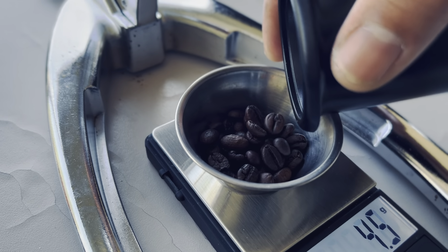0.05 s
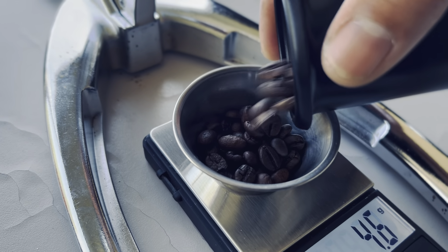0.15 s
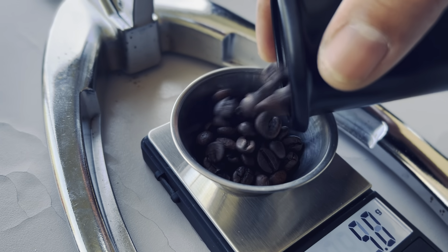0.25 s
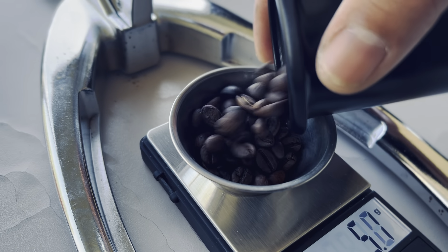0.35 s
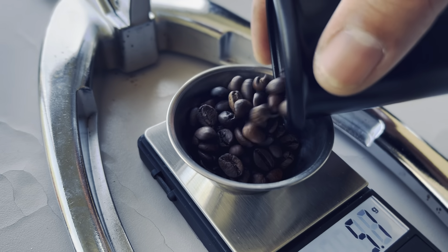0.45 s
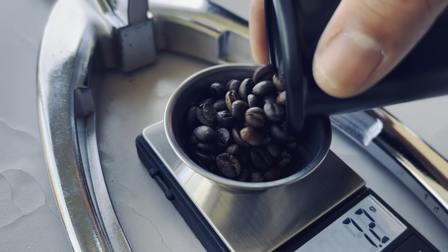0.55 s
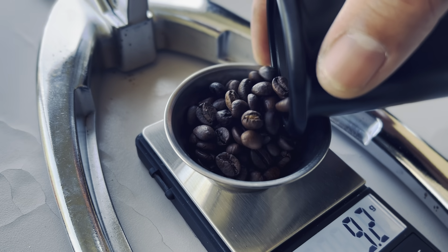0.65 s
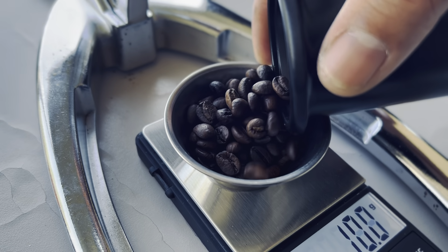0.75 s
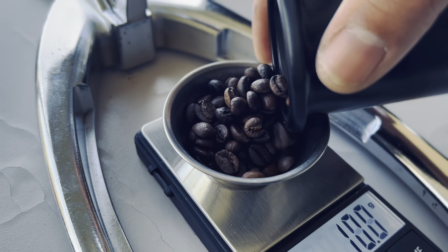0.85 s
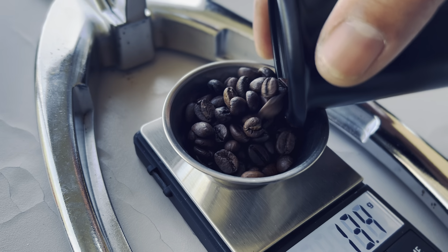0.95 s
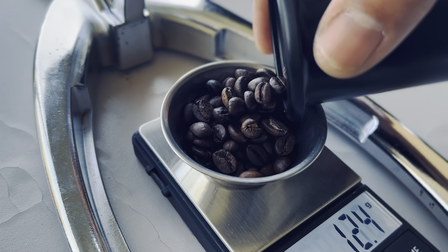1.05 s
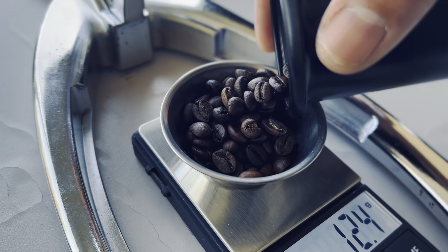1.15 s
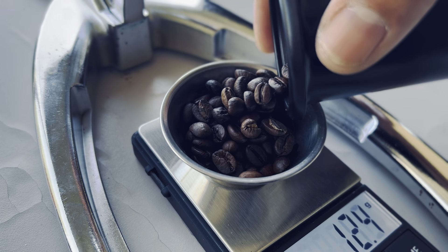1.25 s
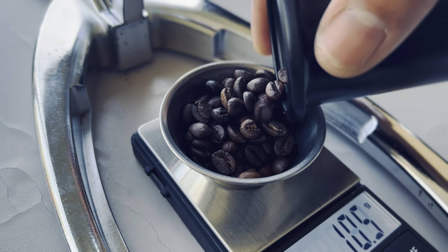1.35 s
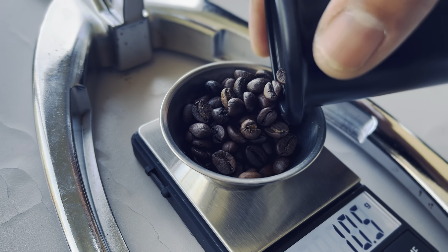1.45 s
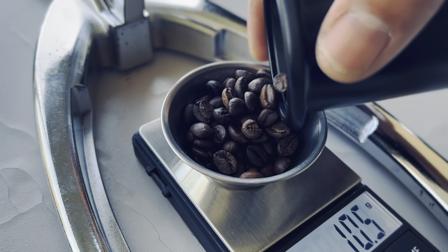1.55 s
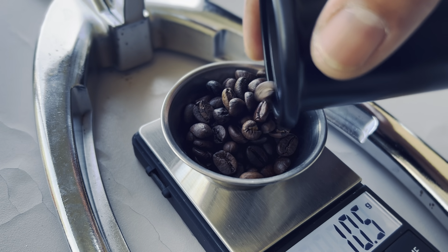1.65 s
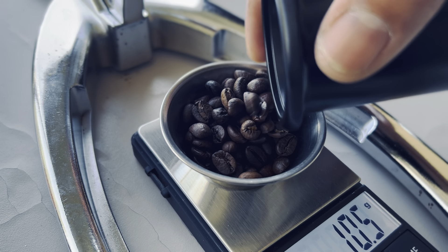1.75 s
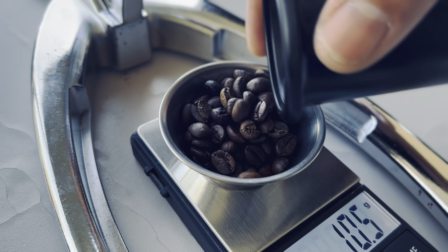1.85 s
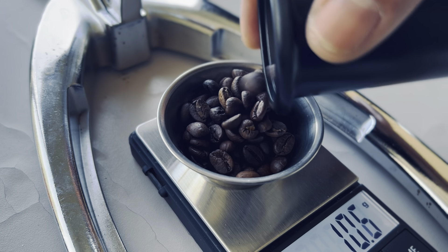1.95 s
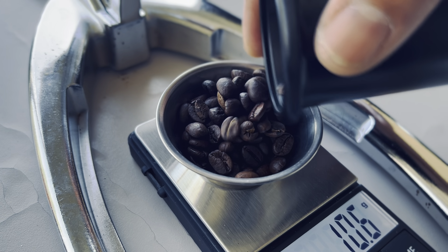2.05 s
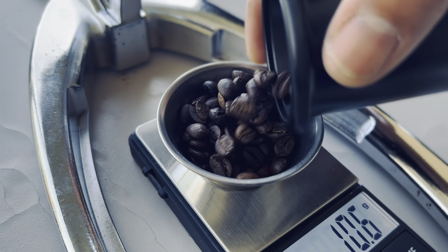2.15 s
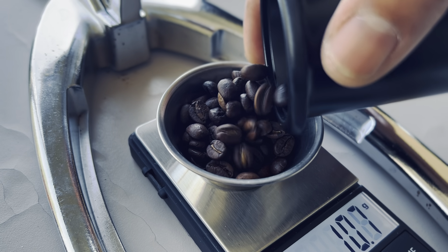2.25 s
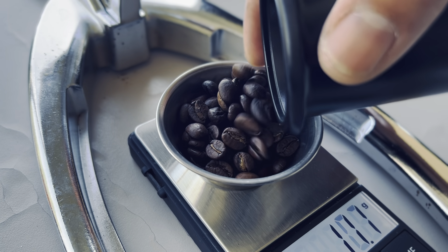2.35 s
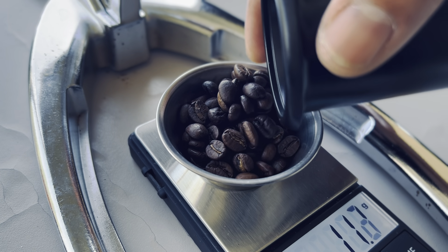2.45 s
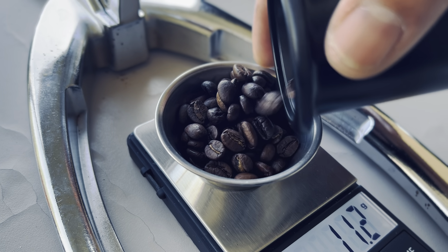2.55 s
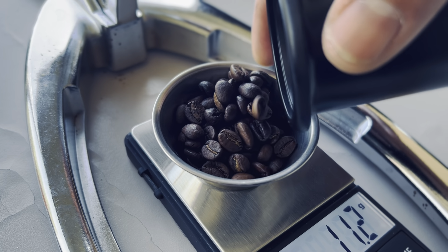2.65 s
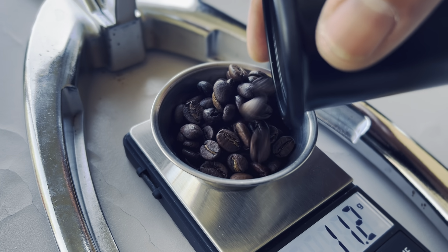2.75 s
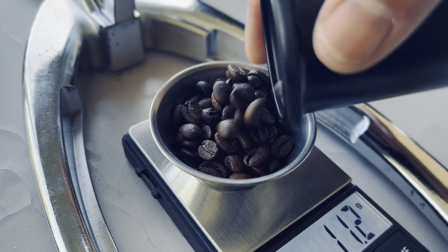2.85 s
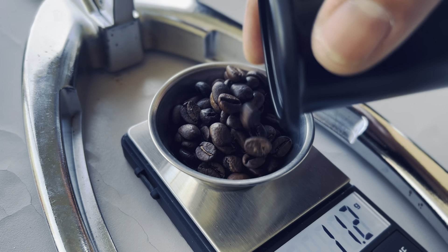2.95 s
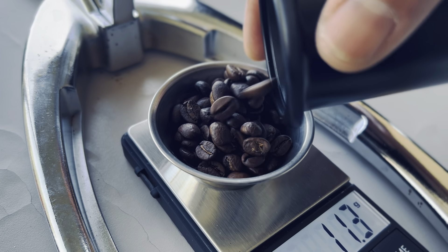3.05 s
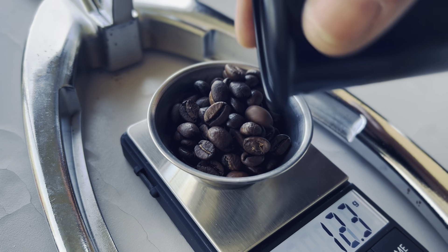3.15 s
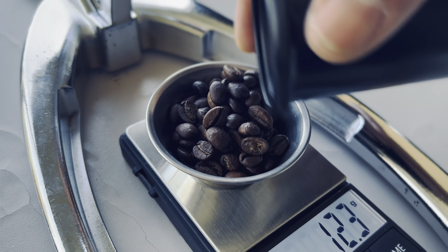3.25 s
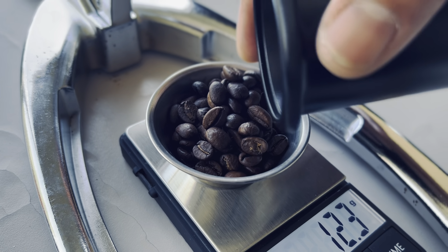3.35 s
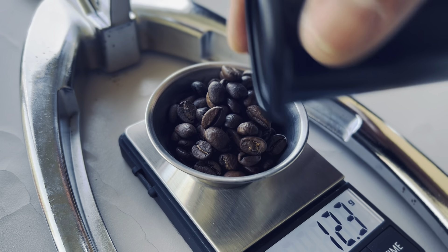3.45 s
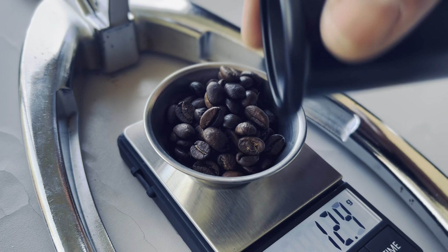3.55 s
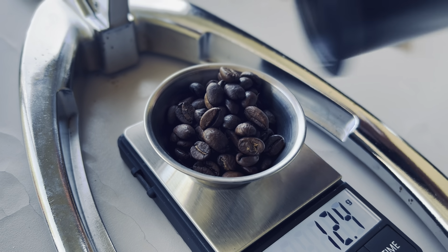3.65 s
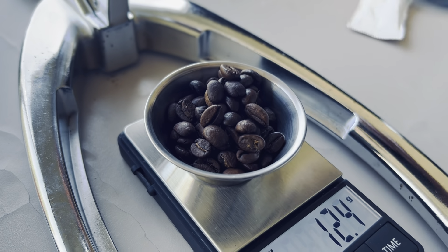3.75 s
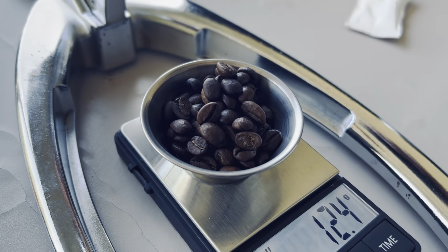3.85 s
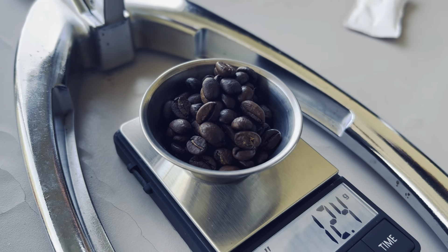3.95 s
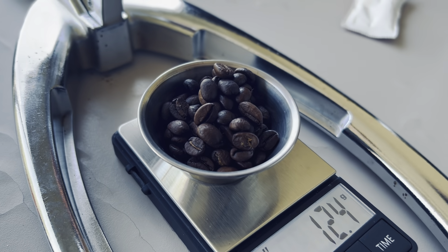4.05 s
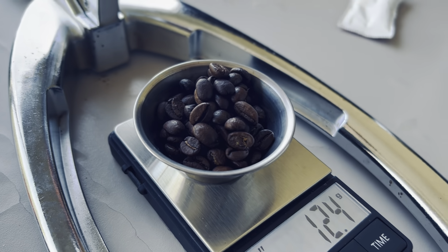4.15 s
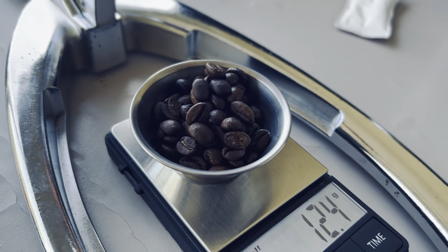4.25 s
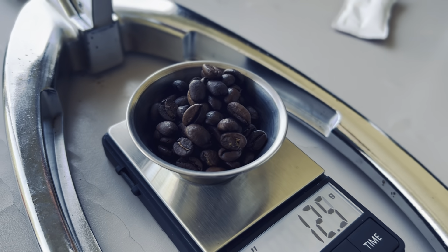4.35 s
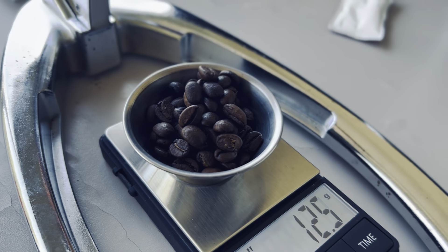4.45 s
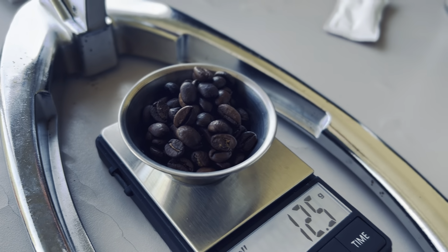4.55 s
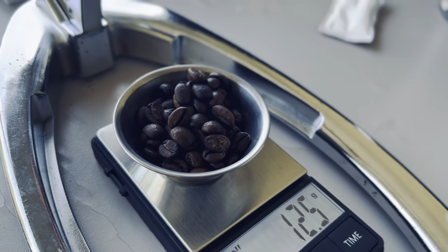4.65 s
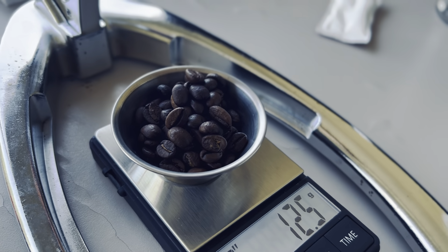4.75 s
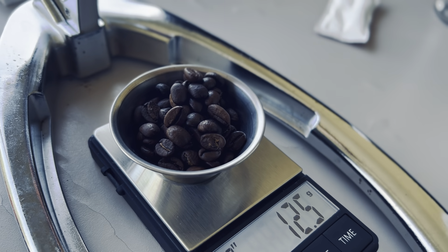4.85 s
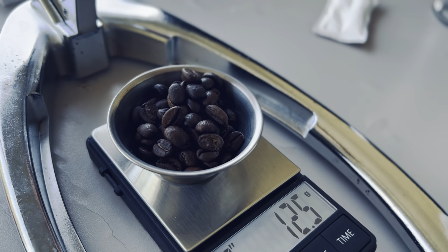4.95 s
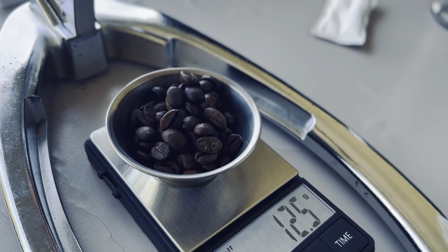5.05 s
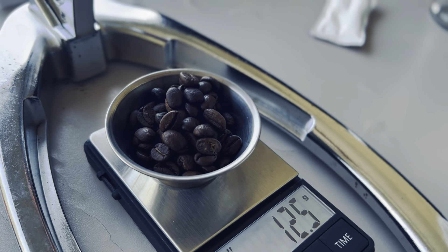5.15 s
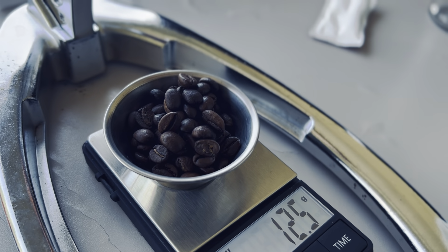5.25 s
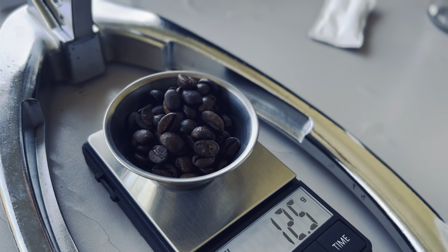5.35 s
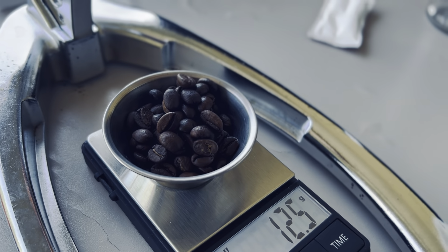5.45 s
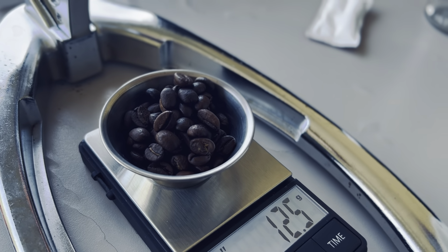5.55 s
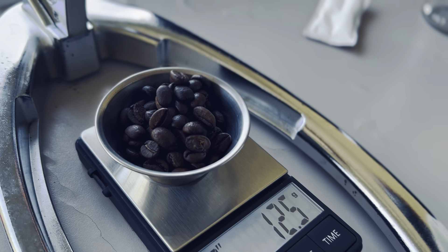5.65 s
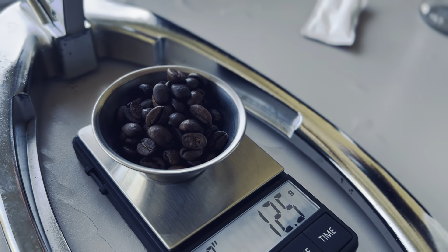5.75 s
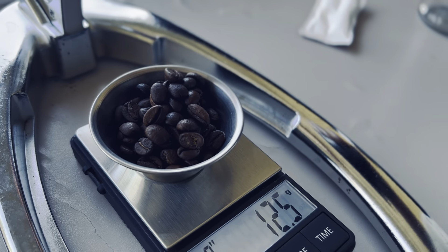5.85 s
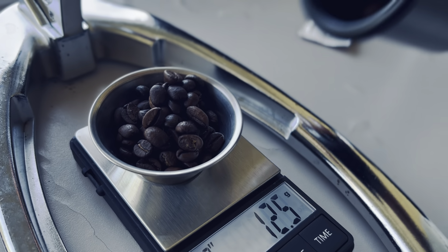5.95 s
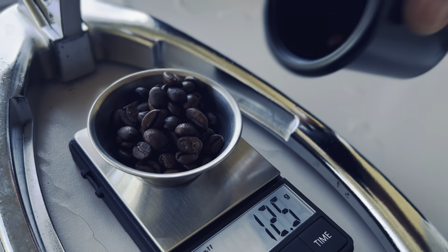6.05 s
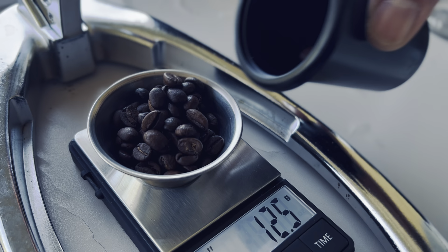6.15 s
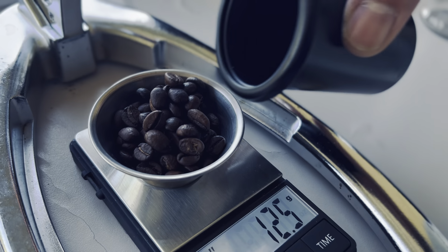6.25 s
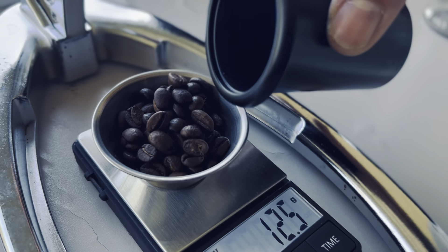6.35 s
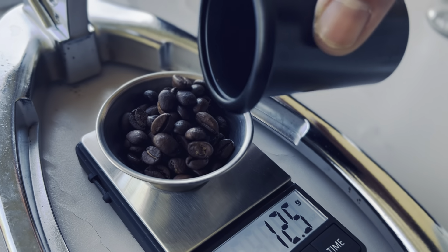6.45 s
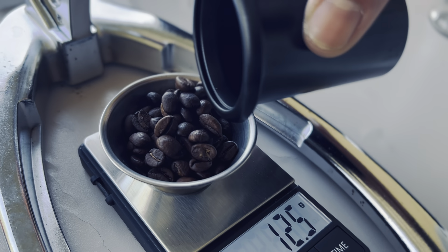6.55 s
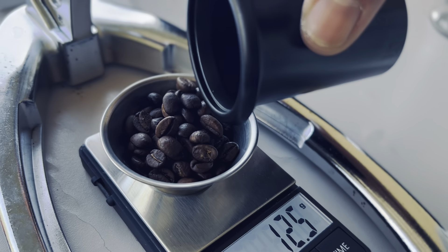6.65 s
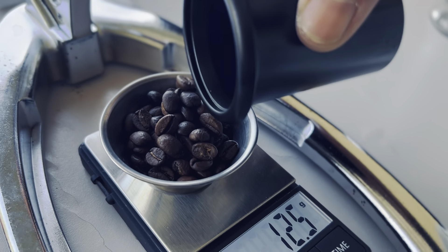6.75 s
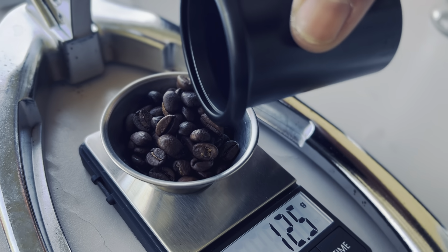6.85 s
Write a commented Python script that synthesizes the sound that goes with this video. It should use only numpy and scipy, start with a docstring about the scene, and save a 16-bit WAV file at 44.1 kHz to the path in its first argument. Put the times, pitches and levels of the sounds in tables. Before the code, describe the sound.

Roasted coffee beans tick and rattle into a small steel cup, then a plastic canister knocks down and scrapes on the counter.

```python
"""Roasted coffee beans tick and rattle as they pour from a plastic canister into a small steel cup.
The beans click against each other, sound in the hollow canister and make the cup's wall ring.
After more careful shaking, the canister knocks down on the counter, slides, is dragged up again
and gets one last tilt. A fridge and the house hum in the quiet kitchen, and two microphones
a little apart hear it all."""
import sys
import numpy as np
from scipy import signal
from scipy.fft import rfft, irfft, next_fast_len
from scipy.io import wavfile

SR = 44100
rng = np.random.default_rng(int(sys.argv[2]) if len(sys.argv) > 2 else 0)


def bounce(signal):
    """Save signal as a 16-bit WAV file at the path given by the first command-line argument."""
    frames = np.transpose(np.atleast_2d(signal))
    limited = np.clip(frames, -1, 1)
    pcm = np.round(limited * 32767).astype(np.int16)
    wavfile.write(sys.argv[1], SR, pcm)


N = 304290
# when the canister moves to the counter, is lifted, is held upright and comes back nearly empty
ON_COUNTER_S, LIFTED_S, UPRIGHT_S, RETURN_S = 3.5, 4.5, 5.05, 6.2

# The clearest bean landings: t/s, bright tick level/dB, dull part compared with bright/dB
LANDINGS = [(.0088, -30, -3.5), (0.0286, -23, -3), (0.048, -25, -17.5), (0.0555, -33.5, -5), (.11, -30, 7),
            (0.1286, -26.5, -1), (0.1403, -33.5, 10.5), (0.1583, -27.5, 0), (0.1756, -11.5, -9.5),
            (0.1828, -23, -0.5), (0.1997, -11.5, -19), (.216, -8.5, -24.5), (0.2341, -14.5, -23),
            (.2435, -25, -6.5), (.299, -24, -10.5), (0.3081, -24, -8), (.332, -21.5, -4), (.3615, -24, 1),
            (.378, -25, -7.5), (0.389, -20, -5), (0.4112, -19.5, -4), (0.4292, -20, -3.5), (0.4693, -36, 5),
            (0.4946, -42.5, 9), (.511, -32.5, 4.5), (0.518, -37.5, 12), (0.5452, -32, 6.5),
            (0.5687, -33, 4), (0.5965, -26, -2.5), (0.6035, -30, -11.5), (.6376, -18, -2.5),
            (0.6594, -34, 6.5), (0.6743, -36, 2), (.693, -33.5, -1.5), (0.7033, -41, 9), (0.715, -50, 10),
            (0.7436, -31.5, -0.5), (.7575, -39, -3.5), (0.7792, -39, 0.5), (0.7974, -35, 2.5),
            (0.8408, -40, -5.5), (.895, -37, -3.5), (0.9263, -39, 6), (.941, -58, 23), (0.9537, -57, 24),
            (0.9672, -39, -6), (0.9843, -37, -4), (0.992, -31.5, -3.5), (1.022, -31.5, -8),
            (1.056, -48.5, -1), (1.3752, -42, -8), (1.604, -50.5, 4.5), (1.6136, -57, 17), (1.647, -48, -2),
            (1.6877, -40.5, -5.5), (1.805, -30, -21), (1.8705, -41, -11), (1.907, -50, 3.5),
            (1.945, -39, 12.5), (1.9508, -29, -10), (1.9727, -34.5, 3.5), (1.9842, -33.5, -10.5),
            (1.991, -23, -24), (2.0128, -26.5, -2.5), (2.0251, -35, -6.5), (2.04, -35, -20),
            (2.1054, -39.5, -3), (2.1182, -48, 19.5), (2.134, -29, 2), (2.1533, -26.5, -1),
            (2.1618, -39, -8.5), (2.1804, -18, -8), (2.197, -30, 0), (2.232, -47.5, 5), (2.2776, -35.5, 2),
            (2.2918, -30, 2), (2.306, -59, 25.5), (2.321, -28.5, -13), (2.337, -26, 2), (2.3702, -35, -7),
            (2.375, -38, -13), (2.3879, -32.5, -9.5), (2.3978, -35, -2), (2.412, -38.5, -8.5),
            (2.4277, -23.5, -11), (2.5182, -52.5, 14), (2.5754, -43.5, 2), (2.5826, -20.5, -28.5),
            (2.6023, -33, 4.5), (2.64, -24, -24.5), (2.6746, -43.5, 8), (2.6863, -43, 2),
            (2.717, -42.5, -5), (2.7483, -32, -1), (2.759, -43.5, 13.5), (2.7698, -31.5, -11),
            (2.7878, -26, -21), (2.792, -30, -12), (2.7987, -29, -12), (2.8135, -25.5, -6), (2.816, -29, 1),
            (2.8408, -39.5, 9), (2.861, -30.5, -23), (2.8693, -29, -18.5), (2.8929, -24.5, .5),
            (2.9195, -31.5, -9.5), (2.939, -26, -7), (2.9503, -20.5, -9.5), (2.9624, -35, -3.5),
            (2.983, -38.5, -2), (3.0152, -35.5, -23), (3.041, -51, 10), (3.0532, -33.5, 3.5),
            (3.09, -28.5, -11), (3.1042, -32, -8), (3.1207, -45, 0), (3.1299, -47.5, -9),
            (3.1876, -31.5, -10.5), (3.225, -53.5, -2), (3.876, -38.5, -15), (4.1515, -53.5, 8),
            (4.411, -60, 21.5), (4.5677, -26, 0.5), (4.5806, -32.5, 12), (4.5907, -19, 4.5),
            (4.6218, -45, 3), (4.656, -26, -11.5), (4.7005, -32.5, 2.5), (4.741, -28.5, -11),
            (4.76, -39.5, 14), (4.859, -49, 18), (4.8753, -41.5, 7), (4.923, -28.5, 1.5), (4.9315, -37, 6),
            (4.948, -15.5, -7.5), (4.956, -43, 0), (4.979, -13.5, -14), (4.9837, -30.5, -14),
            (5.015, -21.5, -6), (5.021, -19.5, -10), (5.0634, -42.5, 5), (5.079, -27, 3.5),
            (5.1064, -43.5, 3), (5.1337, -20, -5), (5.1564, -19, 1.5), (5.1728, -27.5, -8), (5.188, -28, 4),
            (5.2104, -38, 15.5), (5.2404, -36.5, 11), (5.2497, -28.5, 3), (5.2807, -32, 3),
            (5.3248, -39, 11), (5.3375, -30, -14.5), (5.3582, -52.5, 14), (5.3748, -49, 1),
            (5.763, -50.5, 3), (5.773, -52, -3), (5.9743, -52, 7), (5.9929, -42, 1), (6.527, -45, -7),
            (6.569, -45, 8.5), (6.655, -53, 15.5), (6.6727, -48, 4), (6.8339, -56, -14)]
# Moving beans, one curve each for pouring, shaking, settling, lifting and the last tilt:
# t/s, dull level/dB, bright part compared with dull/dB
RATTLE_CURVES = [
    [(0, -61, -12), (.04, -49.5, -2), (.1, -51, -6), (.22, -38.5, 2.5), (.42, -41.5, 5), (.5, -47, -8),
     (.65, -60, -7.5), (.74, -70, -5.5), (1.02, -64.5, -16), (1.13, -100, 8)],
    [(1.5, -110, -6), (1.62, -65.5, -13), (1.78, -87, 5), (1.87, -58.5, -8), (2.0, -54, -24),
     (2.08, -71, -7), (2.2, -57, -3.5), (2.3, -54, -24), (2.38, -69, -5), (2.53, -60, -6.5),
     (2.74, -57.5, -9), (2.81, -46.5, -7), (2.95, -66, -6), (3.05, -68, -9), (3.12, -72, -10),
     (3.3, -96, -2)],
    [(3.6, -86.5, -9), (3.65, -44.5, -16.5), (3.72, -66, -1), (3.79, -69, 5.5), (3.84, -80, -6),
     (3.89, -72.5, 19), (3.96, -75.5, -1.5), (4.1, -69, 0.5), (4.44, -77.5, -9), (4.49, -78, 10.5)],
    [(4.55, -73.5, -8.5), (4.6, -36, -5.5), (4.7, -42, -4.5), (4.83, -52.5, -7), (4.92, -47.5, -2.5),
     (5.05, -55.5, 1), (5.12, -42.5, -8), (5.21, -44.5, 0), (5.33, -56, 0), (5.4, -76, -6),
     (6.0, -77.5, -3.5), (6.2, -95.5, 3)],
    [(6.43, -100, 6), (6.52, -54.5, -9), (6.6, -73.5, -7), (6.67, -64, -5.5), (6.74, -84.5, -1),
     (6.9, -58.5, -9)],
]


def beans():
    """Beans land with dry ticks over a rattle of tiny touches; both also sound in the canister."""
    now = np.arange(N) / SR
    rattle_db, shine_db = in_time(np.concatenate(RATTLE_CURVES))
    # Stray beans land at random, up to 70 a second; a faint rattle sends none flying.
    strays_per_s = 70 * np.clip((rattle_db + 72) / 14, 0, 1)
    strays = np.flatnonzero(rng.random(N) < strays_per_s / SR)
    lifted_db = -4 * (now[strays] > LIFTED_S)  # once lifted, beans slide more than they fly
    scatter_db = 4 * rng.standard_normal((N, 2))[strays].T
    stray_bright_db, stray_dull_db = rattle_db[strays] + 7.5 + lifted_db + scatter_db
    times, bright_db, dull_db = np.transpose(LANDINGS)
    at = np.append(np.round(times * SR).astype(int), strays)
    bright_sizes = from_db(np.append(bright_db, stray_bright_db + shine_db[strays]))
    dull_sizes = from_db(np.append(bright_db + dull_db, stray_dull_db + 2))
    bright = ticks(at, bright_sizes, 9360, 15850, tones=24, cycles=78, roll_s=.0012)
    dull = ticks(at, from_db(1.5) * dull_sizes, 2300, 9400, tones=24, cycles=60, roll_s=.0025)

    touch_at, touch_sizes = touches(count=8000)
    dull_rattle = ticks(touch_at, touch_sizes, 1000, 9400, tones=20, cycles=53, roll_s=.0015)
    contacts = unit_level(two_way_clicks(touch_at, touch_sizes))
    # Each landing shuffles the heap for a moment and knocks on the canister.
    knocks = clicks(at, dull_sizes)
    shuffle_fade_s = .096
    shuffle = signal.lfilter([from_db(-27)], [1, -from_db(-60 / (shuffle_fade_s * SR))], knocks)
    stir = np.hypot(from_db(rattle_db), shuffle)
    inside = canister(stir * contacts + from_db(7) * knocks)
    # The sound slowly turns more hollow, with a jump when the canister is held upright.
    hollow = from_db(-5 + 1.12 * np.minimum(now, UPRIGHT_S) + 8 * (now > UPRIGHT_S))
    body = (dull + stir * unit_level(dull_rattle) + hollow * inside) / np.hypot(1, hollow)
    hiss = ticks(touch_at, touch_sizes, 9330, 15850, tones=36, cycles=36, roll_s=.0015)
    return bright + body + stir * from_db(shine_db) * unit_level(hiss)


# The tone colour of a bean's tick: f/Hz, relative level/dB
TICK_COLOUR = [(1000, -19.5), (2300, -16.5), (3100, -11.5), (3900, -7), (4800, -10.5), (6000, 6.5),
               (7100, -3.5), (8500, -4), (9400, -4), (10800, -18.5), (12000, 3), (13300, 3.5),
               (14300, -3.5), (15500, -8.5)]


def ticks(at, sizes, low_hz, high_hz, tones, cycles, roll_s):
    """Each touch rings its own mix of short tones; a rolling bean starts them a little apart."""
    pitches = np.linspace(low_hz, high_hz, tones) * (1 + .0076 * rng.standard_normal(tones))
    mix = rng.standard_normal((len(at), tones)) * from_db(at_hz(TICK_COLOUR, pitches))
    mix /= np.linalg.norm(mix, axis=1, keepdims=True)
    starts = at[:, None] + (rng.random((len(at), tones)) ** 2 * roll_s * SR).astype(int)
    return sum(ring(clicks(starts[:, k], sizes * mix[:, k]), hz, cycles / hz)
               for k, hz in enumerate(pitches))


# The canister's tones: f/Hz, width/Hz, then relative level/dB when pouring, upright and nearly empty
CANISTER_TONES = [(3060, 90, -7, -11, -4), (3980, 80, -16, -10, -14), (5350, 130, -9, -11, -12),
                  (5850, 160, 0, -9, -8), (6170, 150, -5, 0, -10), (7100, 200, -5, -3, -12),
                  (7650, 90, -11, -9, 0), (8620, 120, -10, -10, -12)]


def canister(contacts):
    """The hollow body colours the rattle, keeping its energy; grip and filling change the colour."""
    sounds = []
    for level_column in (2, 3, 4):
        tones = np.array(CANISTER_TONES)[:, [0, 1, level_column]]
        one_tap = resonate(signal.unit_impulse(SR // 10), tones)
        sounds.append(resonate(contacts, tones) / np.linalg.norm(one_tap))
    grip = np.searchsorted((UPRIGHT_S, RETURN_S), np.arange(N) / SR)
    return np.choose(grip, sounds)


# The steel cup's tones: f/Hz, relative level/dB, time to fade by 60 dB while empty/s
CUP_TONES = [(4727, -15, .13), (5652, -24, .1), (6261, -16, .14), (7305, -20, .1), (8215, -19, .1),
             (9370, -16, .1), (10810, -17, .07), (12530, -11, .07), (12890, -7, .05), (13070, -11, .04),
             (13295, 0, .075), (13540, -5, .06), (13606, -7, .05), (13970, -11, .05), (14350, -15, .04),
             (14800, -10, .05)]
# Beans hitting the cup's bare wall: t/s, relative level/dB, extra for the deep tones/dB
WALL_HITS = [(0.047, -28, 1), (0.1746, -18.5, -3.5), (0.2102, -19, 0), (0.2154, -2, -1), (0.2303, -10, -7),
             (0.245, -9, 3), (0.2764, -1.5, -4), (0.298, -11.5, -3), (0.3346, -13, 0.5),
             (0.3404, -10, -1.5), (0.411, -10.5, -4.5), (0.4292, -32.5, -9), (0.598, -19.5, -10),
             (0.6378, -14.5, -12.5), (0.6619, -28, -14), (0.7516, -23.5, 4.5), (0.793, -22, 0),
             (0.853, -20.5, -5.5), (0.8943, -30, -1), (0.927, -30, -17), (2.1816, -36, -8),
             (2.4114, -27, 10), (2.4265, -11, -2.5), (2.9492, -20, -2)]


def cup():
    """Each hit rings all the cup's tones by uneven amounts; beans on the bottom shorten the ring."""
    times, hit_db, deep_db = np.transpose(WALL_HITS)
    at = np.round(times * SR).astype(int)
    covered = times > .5  # beans now cover the bottom
    shape = (len(at), len(CUP_TONES))
    mix = from_db(rng.normal(0, 3.2, shape)) * rng.choice([-1, 1], shape)
    sound = 0
    for k, (hz, db, fade_s) in enumerate(CUP_TONES):
        deep = hz < 11000
        force = mix[:, k] * from_db(hit_db - 14 + db + deep_db * deep + 2.2 * covered)
        sound += ring(clicks(at, force * ~covered), hz, fade_s)
        sound += ring(clicks(at, force * covered), hz, fade_s * (.22 if deep else .7))
    return sound


# The tones of the canister's base on the counter: f/Hz, width before widening/Hz, relative level/dB
BASE_TONES = [(605, 62, -8.5), (860, 59, -6), (1296, 60, 0), (1800, 45, -9.5), (2164, 60, -15),
              (2710, 30, -17), (3150, 43, -3.5), (5767, 70, -17), (8500, 110, -24)]
# The base landing: t/s, relative level/dB
BASE_LANDING = [(3.63, -4)]
# The short slide after it: t/s, relative level/dB
SLIDE_CURVE = [(3.632, -58), (3.645, -34.5), (3.68, -37), (3.71, -36.5), (3.73, -40), (3.745, -61.5),
               (3.78, -68)]


def set_down():
    """The base hits the counter with a short crack, rocks once and then slides."""
    (landing_s, db), = BASE_LANDING
    start_s, rock_s, crack_fade_s = landing_s + .001, .00255, .011
    age = np.arange(N) / SR - start_s
    crack = rng.standard_normal(N) * (age >= 0) * from_db(-60 * np.clip(age, 0, 1) / crack_fade_s)
    at = (np.array([start_s, start_s + rock_s]) * SR).astype(int)
    blow = crack + 5 * clicks(at, [1, .8])
    thud = resonate(blow, BASE_TONES, widen=1.3)
    snap = signal.sosfilt(signal.butter(2, [450, 2000], "band", fs=SR, output="sos"), blow)
    knock = thud / np.max(np.abs(thud)) + .74 * snap / np.max(np.abs(snap))
    slide_db, = in_time(SLIDE_CURVE, outside=-120)
    slide = scrape(slide_db - 3, BASE_TONES, grit_db=-3, count=5000, widen=1.4)
    return from_db(db - 5) * knock + slide


# The drag along the counter: t/s, relative level/dB
DRAG_CURVE = [(4.555, -68.5), (4.575, -28), (4.592, -27.5), (4.616, -33), (4.64, -31.5), (4.7, -37.5),
              (4.725, -49.5), (5.05, -49), (5.4, -59)]
# The counter's tones: f/Hz, width/Hz, relative level/dB
COUNTER_TONES = [(391, 50, -14), (445, 45, 0), (785, 91, -14), (1306, 400, -4.5), (2400, 170, -17.5)]


def drag():
    """The counter drones as the canister is dragged up off it."""
    drag_db, = in_time(DRAG_CURVE, outside=-120)
    return scrape(drag_db - 2.5, COUNTER_TONES, grit_db=-16, count=14000)


def scrape(level_db, tones, grit_db, count, widen=1):
    """Rubbing is many tiny bumps: they ring a body and are also heard bare, as dull grit."""
    bumps = two_way_clicks(*touches(count))
    body = resonate(bumps, tones, widen)
    grit = signal.sosfilt(signal.butter(1, [500, 2500], "band", fs=SR, output="sos"), bumps)
    return from_db(level_db) * (unit_level(body) + from_db(grit_db) * unit_level(grit))


# How far the left microphone leads, for sound at the cup, on the counter and behind: f/Hz, phase/rad
CUP_LEAD = [(0, 0.5), (950, 1.5), (2150, 1.1), (2500, 1.5), (3270, -2.5), (4050, -2), (5510, -9),
            (6120, -8), (6550, -9.5), (7240, -13), (14300, -20), (16200, -19)]
COUNTER_LEAD = [(0, -4), (2410, 2), (2670, -1.5), (3360, -1.35), (5430, -6), (5770, -4.5), (6290, -5),
                (8440, -5), (9300, -3), (12900, -17.5), (14600, -3), (16200, -11.5)]
BEHIND_LEAD = [(0, 0), (1030, -2.6), (1980, -3.1), (2410, -6.3), (2840, -6.1), (5000, -13.7), (6120, -14.9),
               (7060, -19.0), (9730, -21.8), (14300, -25.7), (15500, -27.3), (16200, -27.3)]
# How much louder the left one is, for the same three places: f/Hz, left minus right/dB
CUP_PAN = [(60, -1), (180, 2), (550, 5), (1650, 1), (4970, 2), (15000, -0.5)]
COUNTER_PAN = [(60, -3), (180, 2), (550, 6), (1650, -1.5), (4970, 4), (15000, -0.5)]
BEHIND_PAN = [(60, 0.0), (150, 0.5), (380, -4.0), (950, -1.5), (2380, -1.5), (5980, 3.5), (15000, 0.0)]


def microphones(sound, lead, pan):
    """A sound reaches the two microphones with a gap in timing and level that depends on pitch."""
    size = next_fast_len(N + 4096)
    hz = np.arange(size // 2 + 1) * SR / size
    phase = np.interp(hz, *np.transpose(lead))
    left = from_db(at_hz(pan, hz) / 2) * np.exp(.5j * phase)
    return irfft(rfft(sound, size) * np.array([left, 1 / left]), size)[:, :N]


def kitchen_echo(sound, fade_s=.036):
    """The room throws back a short, slightly dull blur of echoes, different at each microphone."""
    age = np.arange(SR // 2) / SR
    tail = rng.standard_normal((2, len(age))) * from_db(-60 * age / fade_s) * (age > .002)
    tail = signal.lfilter([1], [1, -.3], tail)
    tail /= np.sqrt(np.sum(tail ** 2) / 2)
    return from_db(-10) * signal.fftconvolve(sound[None], tail)[:, :N]


# The hum of the fridge and the house: f/Hz, width/Hz, level/dB
HUM_BANDS = [(53.1, 11.7, -44), (192.8, 5.4, -57), (246, 47, -59), (356.3, 7.5, -59.5), (1208, 10, -70.5)]
# The room's soft rush: f/Hz, level in each 1 Hz slice/dB
ROOM_RUSH = [(20, -78), (40, -81), (70, -75), (90, -72.5), (130, -72.5), (200, -68.5), (310, -77),
             (500, -85), (790, -90.5), (1300, -90), (2000, -98.5), (3200, -106), (7000, -118),
             (10000, -131), (13000, -121), (15500, -127)]
# How alike left and right are: f/Hz, likeness (held between -1, opposite, and 1, the same)
ROOM_LIKENESS = [(60, 1), (120, 0.76), (240, 0.94), (480, 0.34), (950, -0.49), (1890, -0.23), (3770, 0.049),
                 (7520, -1.7), (15000, -0.076)]
# Which side the background leans to: f/Hz, left minus right/dB
ROOM_PAN = [(60, -0.5), (130, 2.5), (290, -3), (640, 0.5), (1410, 4), (3100, 3.5), (6820, 11), (15000, -8)]


def room_hum():
    """Fridge and house hum as narrow bands of noise over a steady rush, alike on both sides in the bass."""
    hz = np.arange(N // 2 + 1) * SR / N
    power = from_db(at_hz(ROOM_RUSH, hz)) ** 2 * SR / N
    for centre_hz, width_hz, db in HUM_BANDS:
        band = np.exp(-2 * ((hz - centre_hz) / width_hz) ** 2)
        power += band / band.sum() * from_db(db) ** 2
    shared, opposed = rfft(rng.standard_normal((2, N)))
    alike = np.clip(at_hz(ROOM_LIKENESS, hz), -1, 1)
    sides = np.array([[1], [-1]])
    pair = np.sqrt(1 + alike) * shared + np.sqrt(1 - alike) * opposed * sides
    lean = from_db(at_hz(ROOM_PAN, hz) / 2 * sides)
    return irfft(pair * lean * np.sqrt(power * N) / 2, N)


def ring(hits, hz, fade_s):
    """Each click starts a pure tone that dies away by 60 dB in fade_s."""
    decay = from_db(-60 / (fade_s * SR))
    turn = 2 * np.pi * hz / SR
    return signal.lfilter([0, np.sin(turn)], [1, -2 * decay * np.cos(turn), decay * decay], hits)


def resonate(force, tones, widen=1):
    """A body picks out its own tones from a force; every second tone is flipped upside down."""
    sound = 0
    for k, (hz, width_hz, db) in enumerate(tones):
        width_hz = widen * width_hz
        decay = np.exp(-np.pi * width_hz / SR)
        feedback = [1, -2 * decay * np.cos(2 * np.pi * hz / SR), decay * decay]
        band = signal.lfilter([1, 0, -1], feedback, force) * (1 - decay * decay) / 2
        sound += (-1) ** k * from_db(db) * band / np.sqrt(width_hz)
    return sound


def touches(count, spread_db=3):
    """Random touches: the samples they fall on and their uneven sizes."""
    return rng.integers(0, N, count), from_db(spread_db * np.minimum(rng.exponential(1, count), 4))


def clicks(at, sizes):
    """Clicks of the given sizes at the given samples."""
    return np.bincount(at, sizes, N)[:N] + 1e-18


def two_way_clicks(at, sizes):
    """Clicks that push or pull at random."""
    return clicks(at, sizes * rng.choice([-1, 1], len(at)))


def in_time(rows, outside=None):
    """Each column of a curve, filled in for every sample."""
    times, *columns = np.transpose(rows)
    return [np.interp(np.arange(N) / SR, times, column, outside, outside) for column in columns]


def at_hz(rows, hz):
    """A curve's value at the given pitches."""
    pitches, values = np.transpose(rows)
    return np.interp(np.log(hz + 1), np.log(pitches + 1), values)


def from_db(db):
    """Decibels as a plain multiplier."""
    return 10 ** (np.asarray(db) / 20)


def unit_level(sound):
    """The sound scaled to an average (rms) level of 1."""
    return sound / np.sqrt(np.mean(sound ** 2) + 1e-20)


def scene():
    """The beans are heard at the cup, on the counter, lifted behind, then at the cup again."""
    place = np.searchsorted((ON_COUNTER_S, LIFTED_S, RETURN_S), np.arange(N) / SR)
    coffee = beans() + cup()
    at_cup = coffee * np.isin(place, (0, 3))
    on_counter = coffee * (place == 1) + set_down()
    behind = coffee * (place == 2) + drag()
    direct = microphones(at_cup, CUP_LEAD, CUP_PAN)
    direct += microphones(on_counter, COUNTER_LEAD, COUNTER_PAN)
    direct += microphones(behind, BEHIND_LEAD, BEHIND_PAN)
    return direct + kitchen_echo(at_cup + on_counter + behind) + room_hum()


def record(dry):
    """The very highest treble is softened, then cut off."""
    soften_hz, cutoff_hz = 15900, 16640
    softened = signal.sosfilt(signal.cheby2(10, 22, soften_hz, fs=SR, output="sos"), dry)
    return signal.sosfilt(signal.cheby2(14, 70, cutoff_hz, fs=SR, output="sos"), softened)


dry = scene()
out = record(dry)
bounce(out)
```